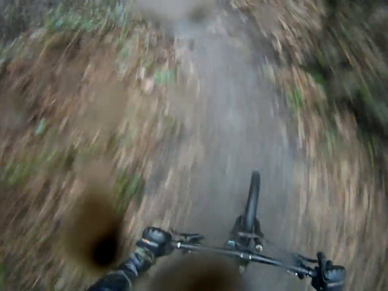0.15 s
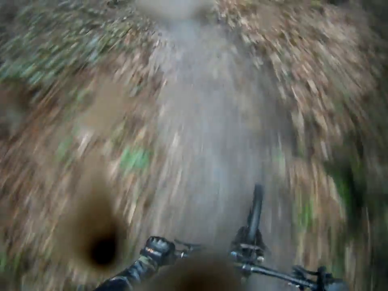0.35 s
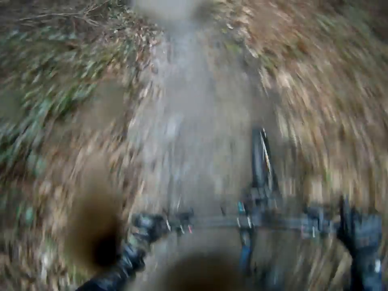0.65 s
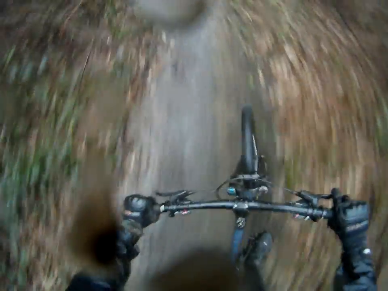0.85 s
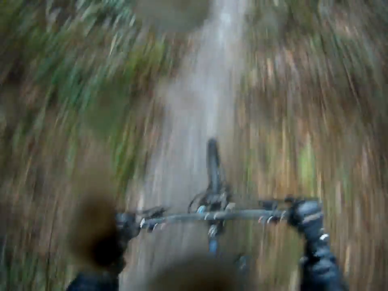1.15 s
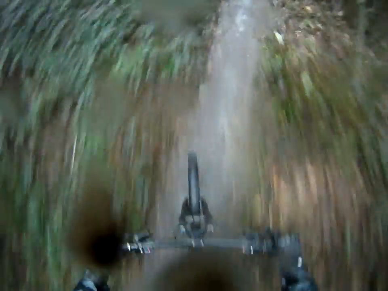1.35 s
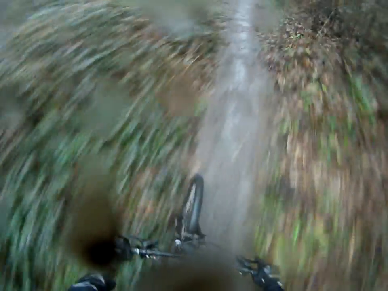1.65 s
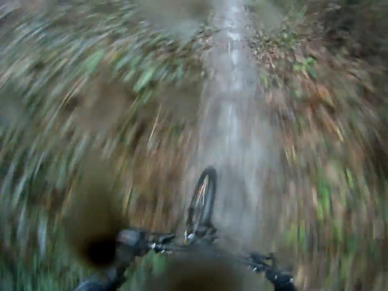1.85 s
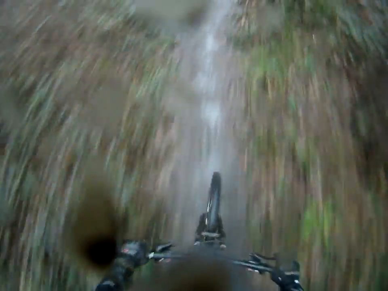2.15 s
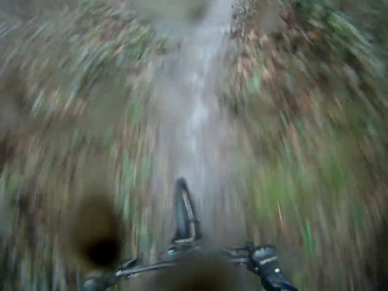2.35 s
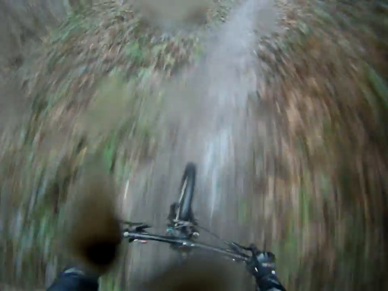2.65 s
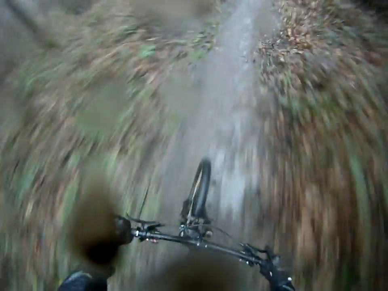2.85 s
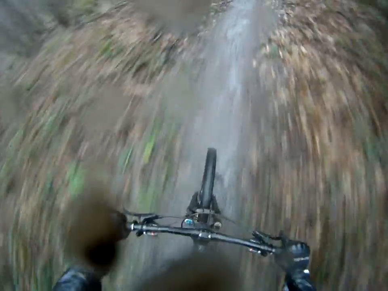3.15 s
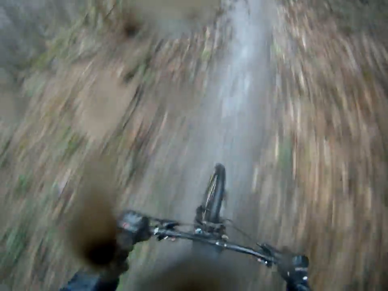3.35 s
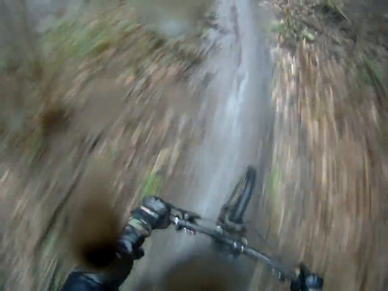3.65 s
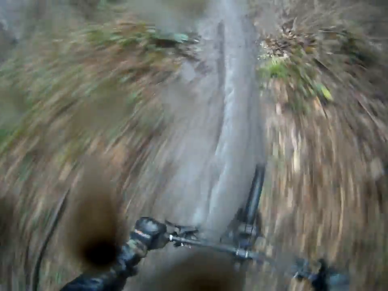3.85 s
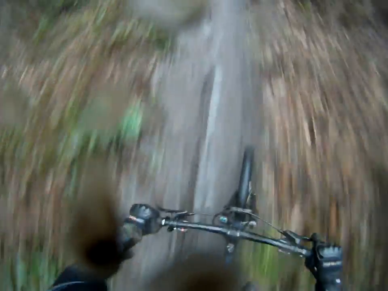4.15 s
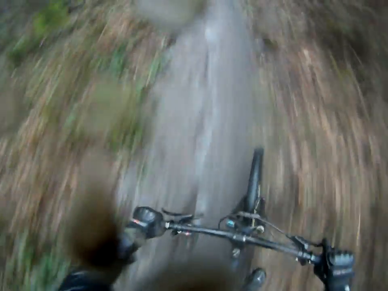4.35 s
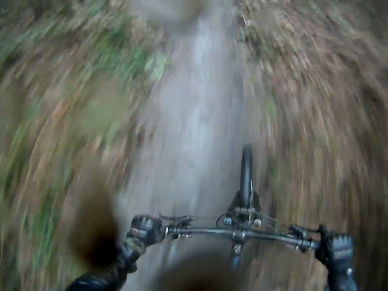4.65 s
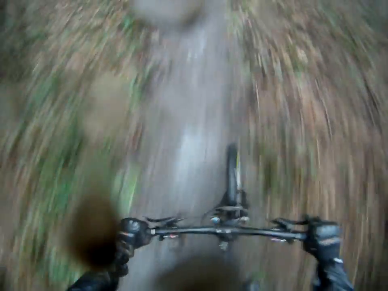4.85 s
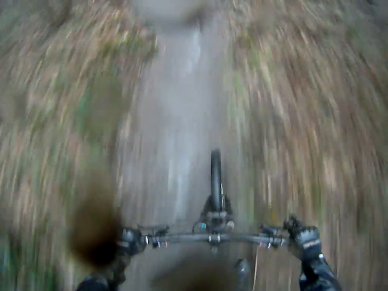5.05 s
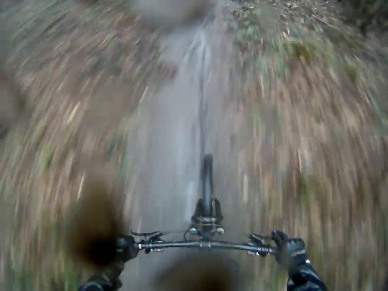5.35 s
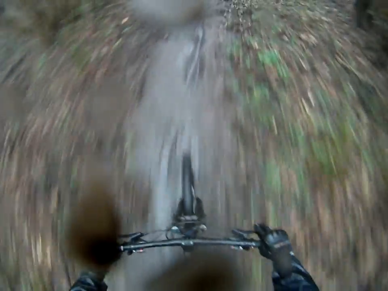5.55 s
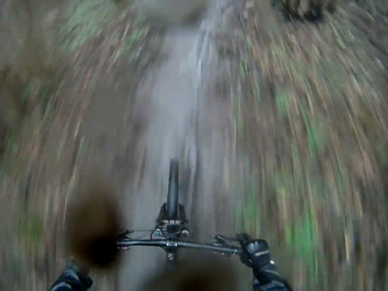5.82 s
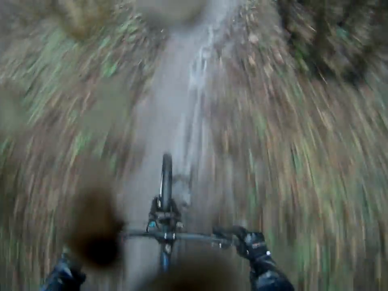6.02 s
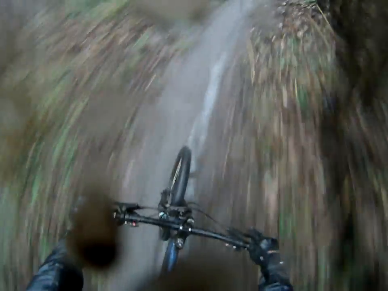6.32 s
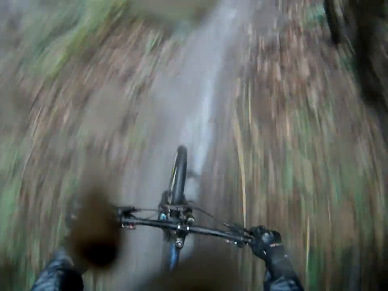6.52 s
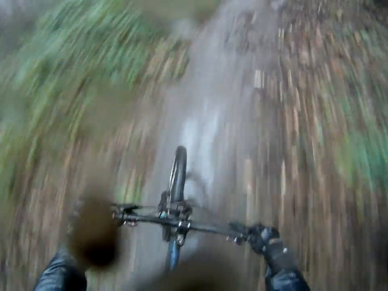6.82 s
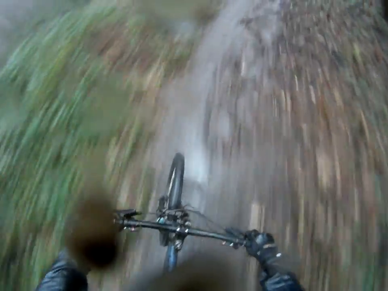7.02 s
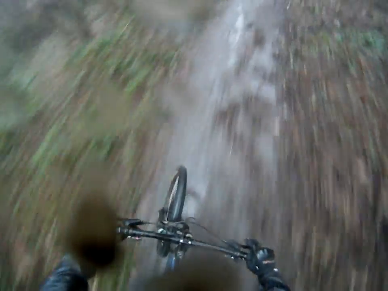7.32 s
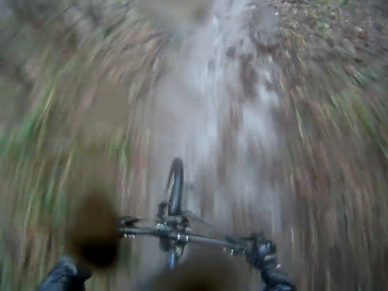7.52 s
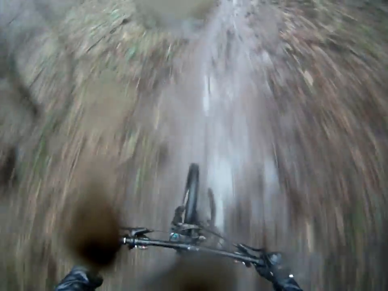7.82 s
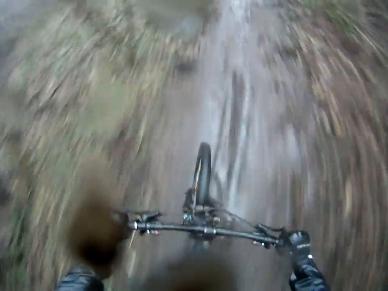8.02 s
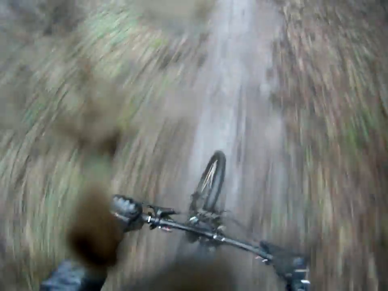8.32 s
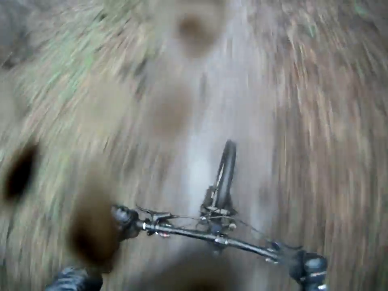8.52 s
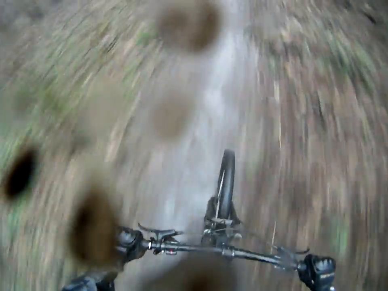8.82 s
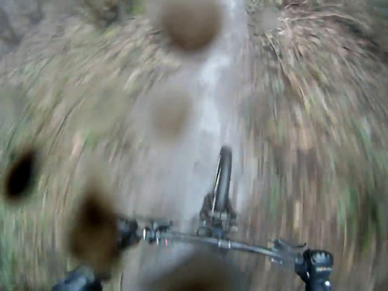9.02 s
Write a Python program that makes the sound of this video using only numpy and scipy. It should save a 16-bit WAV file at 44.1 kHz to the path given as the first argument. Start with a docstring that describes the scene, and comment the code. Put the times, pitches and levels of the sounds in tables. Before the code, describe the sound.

Heard from a helmet camera sealed in a plastic case, a bike speeds down a wet forest trail. Tyres drum softly, squelch and spray beneath constant tiny ticks of grit. Early bumps clack and thud, then it is calmer until a very loud crack just after four seconds, followed by gusty rumbling and hard knocks. Sharp clicks and wet hiss continue to the end.

```python
"""On a wet forest trail a mountain bike runs downhill, heard by a helmet camera in a closed plastic case.
The tyres drum, squelch and hiss: coloured noise and thousands of tiny random impulses make these sounds.
Flung grit, mud and rattling parts click: short noise bursts ring the resonances of the case.
Bumps add knocks and fading sine waves from the camera mount, a dragging brake hums faintly,
and the wind is a deep rumble of noise that rises and falls in gusts."""
import sys
import numpy as np
from scipy import signal
from scipy.fft import rfft, irfft, next_fast_len
from scipy.io import wavfile
from scipy.ndimage import uniform_filter1d, map_coordinates

SR = 44100
rng = np.random.default_rng(int(sys.argv[2]) if len(sys.argv) > 2 else 0)


def master_out(mix):
    """Clip the mix to full scale and print it as 16-bit PCM to the path in sys.argv[1]."""
    frames = np.transpose(np.atleast_2d(mix))
    ceiling = np.clip(frames, -1, 1)
    pcm = np.round(ceiling * 32767).astype(np.int16)
    wavfile.write(sys.argv[1], SR, pcm)


N = 404819  # length in samples

# How strongly the wind buffets the case. Each row: time in seconds, level in dB before an offset.
WIND_LEVEL = [(0.0, -45), (0.54, -44), (0.87, -43), (1.23, -41), (1.41, -46.5), (2.45, -46.5),
              (2.68, -43.5), (3.12, -48), (4.27, -37), (4.86, -28.5), (5.11, -42), (7.06, -41.5),
              (7.18, -41.5), (9.18, -40)]
# How loudly the mud squelches. Each row: time in seconds, level in dB before an offset.
MUD_LEVEL = [(0.0, -61), (1.33, -59), (1.48, -57), (2.14, -60), (2.43, -55.5), (2.96, -56.5), (3.63, -53.5),
             (4.09, -58), (4.34, -52), (4.73, -56.5), (5.8, -53), (6.59, -58), (8.44, -51.5), (9.18, -53)]
# Bumps that knock the bike. Each row: start in seconds, then the levels of clack, boom and thud in dB
# before offsets, then the delay in seconds until the mount bottoms out.
BUMP_LIST = [(0.971, -31.5, -60, -33, 0.0072), (1.037, -37.5, -43, -21, .023),
             (1.309, -32, -29, -11.5, 0.00198), (4.23, -29.5, -34, -16, .02),
             (4.485, -28.5, -34, -38, 0.013), (4.637, -26.5, -22.5, -8.5, 0.013),
             (4.927, -32, -40, -14, .017), (7.171, -45, -40, -24.5, 0.0023),
             (7.385, -44, -39.5, -24.5, 0.0021), (7.571, -25.5, -27.5, -21, .02),
             (8.247, -43, -36.5, -28, 0.0028), (8.331, -40.5, -40, -21.5, 0.0019)]


def amp(db):
    """Turn decibels into a gain."""
    return 10 ** (np.asarray(db) / 20)


def unit(x):
    """Scale a sound to an average (rms) strength of 1."""
    return x / np.sqrt(np.mean(x ** 2) + 1e-20)


def along(points, hz):
    """Read a list of (Hz, value) points at any frequency, on a log axis."""
    f, v = np.transpose(points)
    return np.interp(np.log(hz + 1), np.log(f + 1), v)


def curve(rows):
    """Join (seconds, value) rows with straight lines, giving one value per sample."""
    s, value = np.transpose(rows)
    return np.interp(np.arange(N) / SR, s, value)


def wobble(rate):
    """Draw a smooth random curve through `rate` random points a second."""
    points = rng.standard_normal(int(N * rate / SR) + 4)
    return map_coordinates(points, [np.arange(N) * rate / SR])


def filtered(x, response):
    """Multiply the spectrum of x by a response that depends on frequency."""
    m = 2 * next_fast_len(len(x))
    hz = np.fft.rfftfreq(m, 1 / SR)
    return irfft(rfft(x, m) * response(hz), m)[:len(x)]


def causal(gain):
    """Give a gain curve the minimum-phase response: nothing sounds before its cause."""
    cepstrum = irfft(np.log(gain + 1e-6))
    half = len(cepstrum) // 2
    cepstrum[1:half] *= 2
    cepstrum[half + 1:] = 0
    return np.exp(rfft(cepstrum))


def in_case(x, colour, spot_db=0):
    """A force of the given colour rings the case; the spot it hits favours some resonances over others."""
    # Resonances of the case. Each row: pitch in Hz, width in Hz, level in dB before favour and wall.
    resonances = [(400, 66, -18), (777, 36, -8), (1168, 184, -1), (1513, 140, -1.5), (2075, 194, 4.5),
                  (2587, 303, -2.5), (3190, 240, -8.5), (3580, 255, 1), (4740, 190, -11), (7750, 800, -44),
                  (8450, 250, -10), (9730, 890, -9.5), (9980, 760, -13), (10600, 160, -15),
                  (13700, 470, -25), (14680, 310, -13)]
    # What the case wall lets through. Each row: frequency in Hz, gain in dB.
    wall = [(100, 19), (500, -9), (900, 1), (5200, 3), (6000, -4), (7000, 5.5), (10800, -4), (11600, -17.5),
            (12600, -13), (13600, 7), (15200, -3.5), (15700, -45)]
    favour = spot_db * rng.uniform(-1.6, 1, len(resonances))

    def response(hz):
        power = 0
        for (centre, width, db), extra in zip(resonances, favour):
            detune = (hz ** 2 - centre ** 2) / (hz * width + 1)
            power = power + amp(db + extra) ** 2 / (1 + detune ** 2)
        return causal(np.sqrt(power) * amp(along(wall, hz) + along(colour, hz)))
    return filtered(x, response)


def noise(spectrum):
    """Make coloured noise of rms 1."""
    return unit(filtered(rng.standard_normal(N), lambda hz: amp(along(spectrum, hz))))


def grains(per_s, spread_db):
    """Scatter random impulses, most of them small and a few large."""
    size = amp(spread_db * np.minimum(rng.exponential(size=N), 4))
    return (rng.random(N) < per_s / SR) * size * rng.choice([-1, 1], N)


def add(track, s, x):
    """Mix x into the track at time s in seconds."""
    start = max(round(s * SR), 0)
    track[start:start + len(x)] += x[:len(track) - start]


def contact(colour, life, rise, size=2048):
    """A hit is a brief spatter that rings the case; its energy is that of one millisecond at rms 1."""
    t = np.arange(size) / SR
    attack = 1 - np.exp(-t / rise)
    # before the next step the noise fades by 60 dB in `life` seconds
    force = rng.standard_normal(size) * amp(-60 * t / life) * attack
    # the spatter spreads the blow in time and only partly colours it
    spectrum = rfft(force, 2 * size)
    evened = spectrum / np.sqrt(np.abs(spectrum) + 1e-6)
    force = irfft(evened)[:size] * attack
    ring = in_case(force, colour, spot_db=4.5)
    return ring / np.linalg.norm(ring) * np.sqrt(SR / 1000)


def wind():
    """Air buffets the closed case, which passes only a deep rumble; gusts and bumps stir it up."""
    # Colour of the rumble. Each row: frequency in Hz, relative level in dB per Hz.
    rumble_colour = [(10, -7), (24, 0.5), (38, -4.5), (52, -18.5), (75, -24), (110, -29), (200, -49.5),
                     (500, -69), (3000, -110)]
    # Single gusts. Each row: middle in seconds, half length in seconds, level in dB before the wobble.
    single_gusts = [(0.58, .11, -35), (2.535, 0.11, -42.5), (3.987, 0.029, -39.5), (4.347, 0.041, -23.5),
                    (8.65, 0.032, -33)]
    shake_db, shake_s = -15, 0.025  # buffeting after a thud: level against the thud table, decay time
    strength = amp(curve(WIND_LEVEL) + 2.5)
    t = np.arange(N) / SR
    for s, half_length, db in single_gusts:
        strength = strength + amp(db) * np.exp(-((t - s) / half_length) ** 2)
    shake = (1 - np.exp(-t[:SR] / 0.012)) * np.exp(-t[:SR] / shake_s)
    for s, _, _, thud_db, lag in BUMP_LIST:
        add(strength, s + lag, amp(thud_db + shake_db) * shake)
    strength = strength * amp(1.8 * wobble(6))
    rumble = noise(rumble_colour)
    # the eddies keep a fairly even strength within a gust
    swell = uniform_filter1d(np.abs(signal.hilbert(rumble)), size=8192)
    return strength * unit(rumble / (swell + 0.53))


def brake():
    """A lightly dragging pad keeps one mode of the disc ringing unsteadily."""
    # Each row: start in seconds, length in seconds, starting pitch in Hz, level in dB; both then waver.
    drags = [(3.299, .6, 1790, -61), (8.619, 0.57, 1800, -61.5)]
    rise_hz_per_s, fade_s = 120, 0.08  # the tone creeps up while the pad drags
    out, t = np.zeros(N), np.arange(N) / SR
    for s, length, hz, db in drags:
        drag = np.clip(np.minimum(t - s, s + length - t) / fade_s, 0, 1)
        pitch = hz + rise_hz_per_s * (t - s) + 9 * wobble(45)
        phase = 2 * np.pi * np.cumsum(pitch) / SR
        out += drag * amp(db + 1.96 * wobble(29)) * np.sin(phase)
    return out


def rattle(count=4):
    """Each bump shakes the chain and cables into a few fading ticks."""
    level_db, length_s, fade_db = -11.5, 0.18, 9  # level against the clack table, duration, loss over it
    out = np.zeros(N)
    colour = [(1000, -2), (2300, -0.5), (3600, -1), (5500, -5), (8400, -0.5)]
    for s, clack_db, _, _, lag in BUMP_LIST:
        for late in rng.random(count):
            db = clack_db + level_db - fade_db * late
            add(out, s + lag + length_s * late, amp(db) * contact(colour, life=0.011, rise=0.0003))
    return out


def bumps(size=16384):
    """A bump clacks and booms in the mount, which bottoms out with a second knock and thud, then sways back."""
    # Tones of the shaken mount: sway, push, boom and rap.
    # Each row: pitch in Hz, relative level in dB, time to fade by 60 dB in seconds.
    mount = [(37.4, -1.5, 0.15), (75, -1.5, 0.038), (163, 3, 0.061), (382, -12, 0.026)]
    second_knock_db = -6  # bottoming out, against the first knock
    out, t = np.zeros(N), np.arange(size) / SR
    dull = [(300, 12.5), (800, 7.0), (1200, 1.5), (2200, -13.5), (3600, -27), (6000, -27.5), (14000, -1)]
    attack = 1 - np.exp(-t / 0.0033)
    sway, push, boom, rap = [amp(db - 60 * t / t60) * np.sin(2 * np.pi * hz * t) * attack
                             for hz, db, t60 in mount]
    for s, clack_db, boom_db, thud_db, lag in BUMP_LIST:
        for when, db in ((s, 0), (s + lag, second_knock_db)):
            add(out, when, amp(clack_db + db + 8) * contact(dull, life=0.027, rise=0.002))
            add(out, when + 0.0014, -amp(boom_db + db + 9.5) * (boom + rap))
        hardness_db = 0.58 * (thud_db + 22.5)  # heavy landings push more abruptly
        add(out, s + lag + 0.00056, -amp(thud_db + hardness_db) * push)
        add(out, s + lag + 0.00708, amp(thud_db + 0.5) * sway)
    return out


def grit(count=240):
    """Small specks tick on the case, louder where the mud is deeper or the ground stony."""
    # a stony stretch throws bigger specks: middle, half length, extra dB for the strongest
    stony_s, stony_half_s, stony_gain_db = 3.35, 0.33, 7
    out, mud_db = np.zeros(N), curve(MUD_LEVEL)
    for when, strength, softness in rng.random((count, 3)):
        s = when * N / SR
        stony_db = stony_gain_db * np.exp(-((s - stony_s) / stony_half_s) ** 2)
        ground_db = -41.0 + 0.96 * (mud_db[int(when * N)] + 56.0)
        db = ground_db + (9.0 + stony_db) * strength ** 3
        colour = [(1000, 10 * softness - 8), (2300, 0), (3600, 0), (5500, -10 * softness), (8400, 0)]
        add(out, s, amp(db) * contact(colour, life=0.019, rise=0.00042))
    return out


def clicks():
    """Soft heavy lumps sound longer and lower in the case, hard grit is brief and adds an edge."""
    # The loudest clicks of flung mud and rattling parts. Each row: time in seconds, level in dB before
    # an offset, then body (low part) and treble in dB against the peak, which steer the colour.
    loud_clicks = [(0.061, -27.5, -15, -16), (0.126, -26.5, -20, -18), (0.484, -12, -21, -11.5),
                   (0.827, -32, -16, -13), (0.937, -24, -20, -10), (0.947, -16, -15, -9),
                   (0.97, -11.5, -17, -18), (1.798, -13, -14, -15.5), (2.222, -25, -25, -15.5),
                   (2.537, -26, -19, -23), (2.697, -29, -10, -14), (2.725, -19, -16, -12),
                   (2.867, -33, -1, -13), (2.961, -10, -26, -18), (3.202, -23, -31.5, -24),
                   (3.413, -22, -25, -23), (3.751, -16, -35.5, -19.5), (3.889, -15.5, -32, -16),
                   (4.15, -17.5, -16, -10.5), (4.23, 7, -10, -4), (4.281, -14.5, -9.5, -10.5),
                   (4.297, -24.5, -29, -19), (4.354, -23, -30, -17), (4.418, -15, -7.5, -8.5),
                   (4.465, -25.5, -30, -14), (4.627, -12, -8.5, -19.5), (4.654, -15, -16.5, -17.5),
                   (4.787, -10.5, -12.5, -12.5), (4.979, -14, -15.5, -17.5), (5.093, -6, -20, -23),
                   (5.224, -14.5, -14, -23.5), (5.277, -23.5, -10, -16), (5.396, -2, -26.5, -11.5),
                   (5.465, -8.5, -17, -16), (5.702, -16.5, -13.5, -21), (5.913, -16.5, -19.5, -23),
                   (6.175, -20.5, -13.5, -17), (6.226, -12.5, -20.5, -13.5), (6.251, -22, -24, -18),
                   (6.291, -10.5, -28.5, -18), (6.914, -24, -22, -17.5), (6.96, -28, -12, -20),
                   (7.096, -23.5, -12.5, -15), (7.402, -18, -16, -14.5), (7.5, -17, -17, -14.5),
                   (7.571, -14, -4, -26), (7.643, -2.5, -23.5, -22.5), (7.675, -20.5, -16.5, -15),
                   (7.776, -21, -13, -18), (7.803, -17, -21, -22.5), (8.155, -21.5, -21, -20),
                   (8.233, -20.5, -23, -14), (8.598, -5, -23.5, -10)]
    plain_body_db, plain_treble_db = -18, -15  # colour of an average lump
    spatter_s = 0.013  # fade time of an average lump
    out = np.zeros(N)
    for s, db, body_db, treble_db in loud_clicks:
        force_db = db + 13.5  # against a middling click
        body = 0.98 * (body_db - plain_body_db) - 0.087 * force_db
        ring = 1.32 * (treble_db - plain_treble_db)
        edge = 1.1 * ring - 0.93 * body - 0.28 * force_db - 6.5
        colour = [(300, body + 0.4 * force_db), (560, body + 0.64 * force_db), (780, body - 1),
                  (1150, body + 1.5), (1500, 0.35 * body + 2), (2100, -0.9), (2800, 1.5),
                  (3550, ring - 2), (4700, edge), (7000, edge), (8400, 0.68 * ring + 4),
                  (10500, 0.5 * ring - 1.5), (14500, 0.11 * ring)]
        life = spatter_s * amp(0.28 * body - 0.35 * ring)
        add(out, s + 0.00057, amp(db - 4.5) * contact(colour, life, rise=0.00016))
    return out


def spray_flow(mud_db):
    """Damp ground gives a little spray; each wet patch starts a burst that thins and stops."""
    # Wet patches under the tyres. Each row: start in seconds, length in seconds,
    # spray level in dB before the flutter.
    patches = [(0.53, 0.091, -61), (1.302, 0.15, -55.5), (1.536, 0.41, -56), (2.035, 0.052, -55.5),
               (2.227, .34, -52), (2.617, 0.15, -66), (3.55, 0.24, -62.5), (5.403, 0.54, -50),
               (6.008, 0.64, -55), (6.712, 0.076, -56), (7.276, 0.049, -50.5), (7.394, 0.064, -58),
               (7.757, 0.037, -49.5), (7.874, 0.83, -53), (8.766, 0.37, -55.5)]
    damp_db = -9  # spray between the patches, against the mud table
    attack_s, release_s = 0.0072, 0.027
    shed_db_per_s = 1.5  # the spray thins as the tread sheds its water
    flow, t = amp(mud_db + damp_db), np.arange(SR) / SR
    for s, length, db in patches:
        attack = 1 - np.exp(-t / attack_s)
        release = np.exp(-np.maximum(t - length, 0) / release_s)
        add(flow, s, amp(db - shed_db_per_s * t) * attack * release)
    return flow


def tyres():
    """The knobs drum on the ground, squelch through mud and throw a fluttering spray."""
    # Colour of the drumming. Each row: frequency in Hz, relative level in dB per Hz.
    roll_colour = [(40, -39), (115, -12.5), (172, 3.5), (230, -9), (320, -15.5), (550, -18), (900, -21.5),
                   (2000, -31), (6000, -72)]
    # Colour of the squelch. Each row: frequency in Hz, relative level in dB before the case.
    mud_colour = [(300, -12.5), (800, 10.5), (1200, 2.5), (1500, 0.5), (1800, -0.5), (2100, -2.5),
                  (2900, -1.5), (3550, -5.5), (6000, -4.5), (15000, 0.5)]
    # Colour of the spray. Each row: frequency in Hz, relative level in dB before the case.
    spray_colour = [(500, -32), (1500, -8.5), (2100, -7.5), (3000, -4.5), (3570, -4), (4400, 3), (5400, 7),
                    (6000, 2), (7000, 8), (8400, 1), (10500, -11), (12000, -10), (14500, -0.5)]
    # Short swishes through water. Each row: time in seconds, level in dB before the shape below.
    splashes = [(1.044, -28), (1.223, -41), (1.3197, -24), (4.2595, -32), (4.64, -32)]
    mud_db, buffet_db = curve(MUD_LEVEL), curve(WIND_LEVEL)
    # the drumming grows a little with the wind level
    roll_db = -58.5 + 0.26 * (buffet_db + 47.5) + 0.56 * wobble(25)
    roll = amp(roll_db) * noise(roll_colour)
    squelch = unit(in_case(grains(4000, 4.0), mud_colour))
    mud = amp(mud_db - 0.7 + 1.02 * wobble(44)) * squelch
    flow = spray_flow(mud_db) * amp(0.5 + 1.87 * wobble(24))
    t = np.arange(SR // 10) / SR
    for s, db in splashes:
        add(flow, s - 0.003, amp(db + 1.5) * t / 0.0037 * np.exp(-t / 0.0025))
    spray = flow * unit(in_case(grains(9000, 5.1), spray_colour))
    return roll + mud + spray


def scene():
    """Everything reaches the one microphone inside the case."""
    return (wind() + brake() + rattle() + bumps() + grit() + clicks() + tyres())[None]


def record(dry):
    """The hardest clicks overload the camera, which keeps nothing above its band limit."""
    top_hz = 16600
    clipped = dry[0] / (1 + (dry[0] / 0.9) ** 6) ** (1 / 6)
    return filtered(clipped, lambda hz: np.clip((top_hz - hz) / 500, 0, 1))[None]


dry = scene()
out = record(dry)
master_out(out)
```